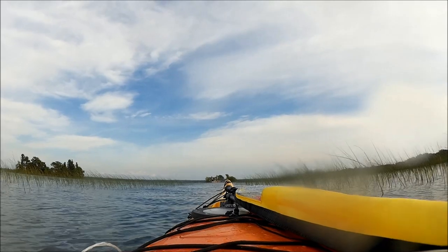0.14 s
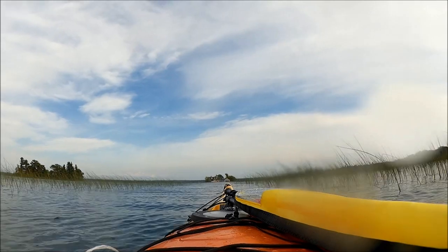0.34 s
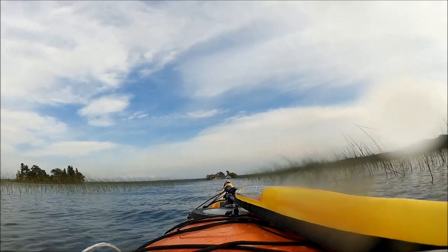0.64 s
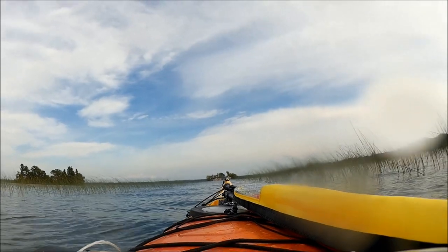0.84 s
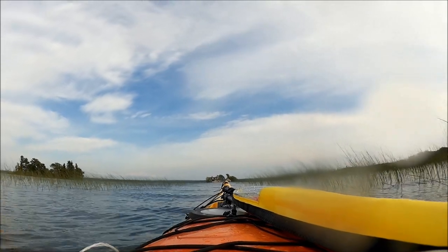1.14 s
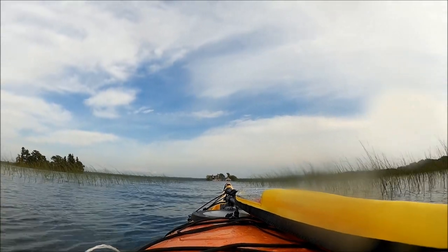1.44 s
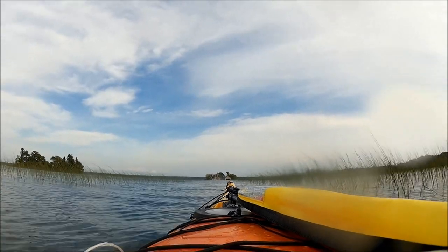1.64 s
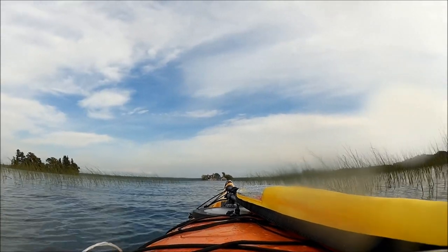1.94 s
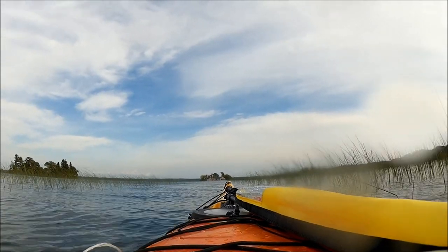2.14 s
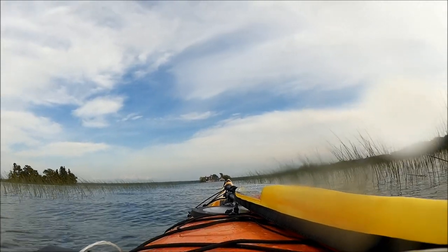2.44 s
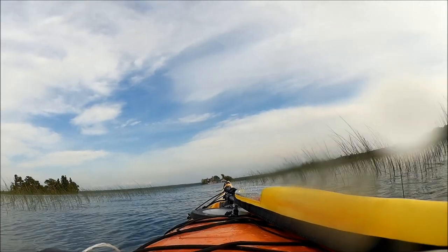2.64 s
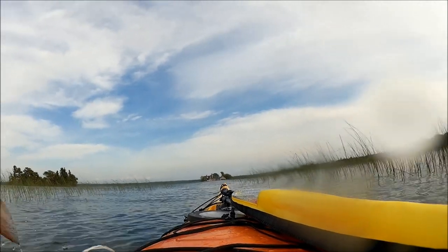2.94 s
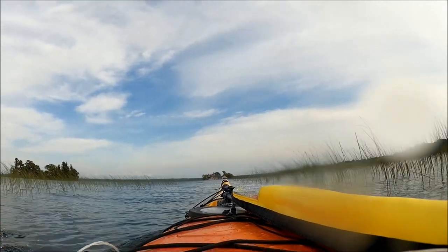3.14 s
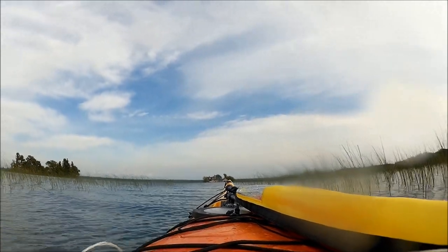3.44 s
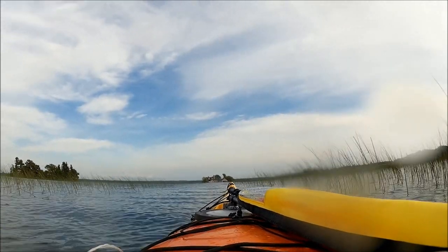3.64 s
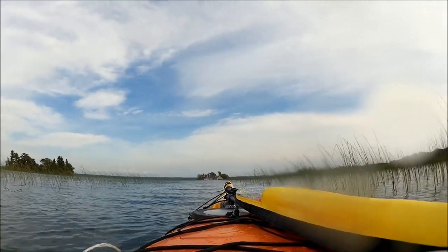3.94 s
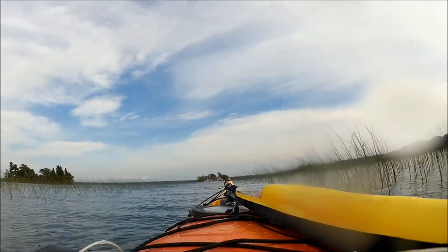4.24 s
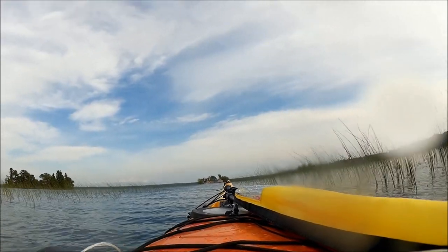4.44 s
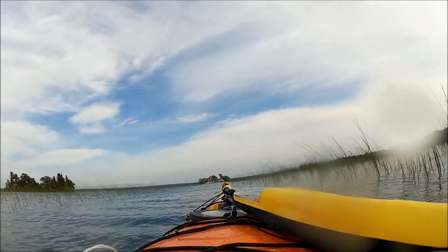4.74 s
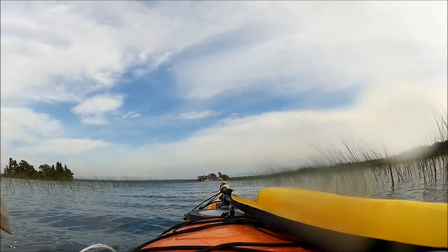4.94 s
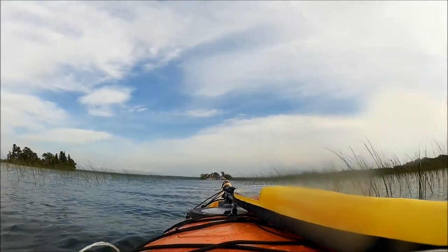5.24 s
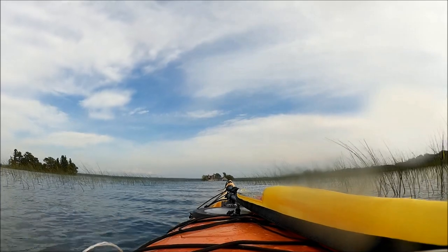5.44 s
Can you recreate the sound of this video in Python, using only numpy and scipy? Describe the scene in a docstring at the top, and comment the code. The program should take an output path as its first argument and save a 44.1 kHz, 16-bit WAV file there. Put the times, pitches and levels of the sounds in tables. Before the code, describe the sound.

Water slaps and splashes against a hollow kayak hull, with bubbly lapping, droplet ticks, small gulps and soft low wind gusts.

```python
"""Kayak hull under paddle strokes

Water splashes on a paddled hull: ringing bubbles make babble, short rings mark bubbles and slaps, gliding
tones make gulps and low thumps, noise bursts make slaps. Droplet clicks make spray, fizz and ticks; shaped
noise makes wind, hiss and a faint hull hum. Water reaches two ports with a lag, each through its cavity's
resonances. Levels precede pans, hull and ports."""
import sys
import numpy as np
from scipy import signal
from scipy.fft import rfft, irfft, next_fast_len
from scipy.io import wavfile
from scipy.ndimage import map_coordinates

SR = 44100
rng = np.random.default_rng(int(sys.argv[2]) if len(sys.argv) > 2 else 0)


def inscribe(sig):
    """Save sig as 16-bit PCM at rate SR to the path in sys.argv[1].

    A 1-D sig is mono; a 2-D sig holds one channel per row.
    Samples are clipped to [-1, 1] before scaling.
    """
    pcm = np.round(np.clip(np.atleast_2d(sig).T, -1, 1) * 32767)
    wavfile.write(sys.argv[1], SR, pcm.astype(np.int16))


N = 246519

# Splashes. Each row: start in seconds, babble level in dB, first bubble pitch in Hz,
# spray level in dB, decay in ms.
SPLASH_ROWS = [(0.02, -37, 730, -48, 57), (0.889, -35, 2200, -34, 24), (0.927, -38.5, 1480, -66, 140),
               (1.181, -46, 1400, -37, 71), (1.401, -28.5, 3000, -22, 26), (1.437, -28, 2240, -17, 38.4),
               (1.765, -31.5, 1160, -36, 33), (1.886, -31.5, 1150, -26, 57), (2.413, -33.5, 810, -28, 96),
               (2.783, -40.5, 1350, -41, 93), (3.314, -29.5, 5230, -22, 34), (3.349, -38.5, 5500, -16, 21),
               (3.403, -37, 3000, -54, 13), (3.735, -49, 1550, -64, 60), (3.757, -48, 3180, -25.5, 32),
               (3.801, -33, 1490, -65, 28), (3.867, -30, 1200, -22, 10), (3.908, -38, 1400, -37, 22),
               (5.319, -38, 2500, -18, 30), (5.374, -21.5, 1110, -58, 18), (5.473, -63, 900, -58, 29)]
# Side of the busiest water. Each row: time in seconds, lag of the right port in microseconds.
BEARING_CURVE = [(0.0, 117), (0.45, 68), (0.701, -100), (1.22, -55), (1.32, 112), (1.65, 135), (1.85, 69),
                 (2.2, 89), (2.31, -110), (3.0, -83), (3.2, 8), (3.32, 138), (3.7, 72), (4.1, 101),
                 (4.4, -100), (4.58, -76), (4.62, 135), (5.1, -21), (5.28, 140)]


def from_db(db):
    """Amplitude gain of a level in dB."""
    return 10 ** (np.asarray(db) / 20)


def rms_one(x):
    """Scales a signal to rms 1."""
    return x / np.sqrt(np.mean(x ** 2) + 1e-20)


def at_hz(points, hz):
    """Reads a (Hz, dB) curve on a log-frequency axis."""
    curve_hz, curve_db = np.transpose(points)
    return np.interp(np.log(hz), np.log(curve_hz), curve_db)


def drift(rate_hz):
    """Slow random curve of rms 1: noise through a two-pole low-pass, run at every 40th sample."""
    pole = np.exp(-80 * np.pi * rate_hz / SR)
    noise = rng.standard_normal(N // 40 + 2002)
    slow = signal.lfilter([1], [1, -2 * pole, pole * pole], noise)[2000:]
    return np.interp(np.arange(N) / 40, np.arange(len(slow)), rms_one(slow))


def coloured(x, spectrum):
    """Filters noise to a spectrum in dB per Hz; rms 1."""
    hz = np.maximum(np.fft.rfftfreq(N, 1 / SR), 1)
    return rms_one(irfft(rfft(x) * from_db(at_hz(spectrum, hz)), N))


def grains(per_s, spread_db):
    """Random clicks of uneven size and either sign."""
    sizes = from_db(spread_db * np.minimum(rng.exponential(1, N), 4))
    signs = rng.choice([-1, 1], N)
    return sizes * signs * (rng.random(N) < per_s / SR)


def add(out, start_s, sound):
    """Mixes a sound in at a time."""
    at = int(start_s * SR)
    out[at:at + len(sound)] += sound[:N - at]


def in_time(rows):
    """Interpolates the dB columns over time into gains at every sample."""
    times_s, *levels_db = np.transpose(rows)
    return from_db([np.interp(np.arange(N) / SR, times_s, column) for column in levels_db])


def bearing_lag_us():
    """Lag of the right port at every sample."""
    return np.interp(np.arange(N) / SR, *np.transpose(BEARING_CURVE))


def dying(decay_ms):
    """Splash envelope: sudden start, exponential tail."""
    rise_s = 0.0012
    t = np.arange(0, 6 * decay_ms / 1000, 1 / SR)
    return np.minimum(t / rise_s, 1) * np.exp(-1000 * t / decay_ms)


def water_gains():
    """Gains of lapping babble, spray and wind; splashes throw extra spray."""
    # Lapping that swells and sinks unevenly. Each row: time in seconds, babble level in dB, spray level in dB.
    lapping_rows = [(0.0, -37.5, -36.5), (0.4, -45, -37.5), (0.7, -44, -89), (0.96, -50, -38.5),
                    (1.28, -51.5, -48.5), (1.51, -39, -58), (1.87, -41, -55), (2.18, -43, -32.5),
                    (2.54, -45.5, -50.5), (2.82, -40, -51), (3.05, -44.5, -46.5), (3.27, -48, -36.5),
                    (3.43, -40.5, -49), (3.58, -47, -40), (3.8, -33, -55), (4.14, -43.5, -36.5),
                    (4.35, -46.5, -48.5), (4.92, -49, -47), (5.29, -45.5, -43), (5.39, -43.5, -77),
                    (5.59, -35.5, -41)]
    # Gusts on the ports. Each row: time in seconds, wind level in dB.
    gust_rows = [(0.0, -48), (0.23, -53), (0.43, -54.5), (0.7, -55.5), (1.28, -60), (1.5, -46.5),
                 (1.62, -59.5), (2.04, -45), (2.18, -57.5), (2.54, -41.5), (2.85, -49.5), (3.0, -52.5),
                 (3.27, -57), (3.43, -43), (3.56, -47), (3.74, -41), (4.3, -57.5), (4.66, -50.5),
                 (5.35, -45.5), (5.5, -39), (5.59, -43.5)]
    babble_gain, spray_gain = in_time(lapping_rows)
    wind_gain, = in_time(gust_rows)
    for start_s, _, _, spray_db, decay_ms in SPLASH_ROWS:
        add(spray_gain, start_s, from_db(spray_db) * dying(decay_ms))
    return babble_gain, spray_gain, wind_gain


def wind(alike):
    """Low noise, partly shared by the ports, gusting separately in each."""
    # Wind spectrum. Each row: frequency in Hz, level in dB per Hz.
    wind_spectrum = [(25, -18), (40, 3), (70, 3.5), (120, 9), (200, -1.5), (330, -7), (600, -25),
                     (1500, -99)]
    shared = rng.standard_normal(N)
    alike = np.clip(alike, 0, 1)
    ports = []
    for _ in range(2):
        noise = np.sqrt(alike) * shared + np.sqrt(1 - alike) * rng.standard_normal(N)
        ports.append(coloured(noise, wind_spectrum) * from_db(6.7 * drift(30)))
    return np.array(ports)


def hiss():
    """Separate steady noise in each port, its level flickering a little."""
    # Hiss spectrum. Each row: frequency in Hz, level in dB per Hz.
    hiss_spectrum = [(1500, -24), (4000, -11), (7500, -5.5), (10400, -10), (12500, -15.5), (14500, -30),
                     (15500, -56)]
    level_db, flicker_db = -72.5, 2.5
    ports = [coloured(rng.standard_normal(N), hiss_spectrum) * from_db(flicker_db * drift(17.0))
             for _ in range(2)]
    return from_db(level_db) * np.array(ports)


def hum():
    """The hull drones faintly as water slides by: noise in one low resonance."""
    hum_hz, q, level_db = 190, 2.7, -55
    peak = signal.iirpeak(hum_hz, q, fs=SR)
    return from_db(level_db) * rms_one(signal.lfilter(*peak, rng.standard_normal(N)))


def babble(lapping_gain, per_s, mean_cycles, climb, wash, froth):
    """Random bubbles on a smooth wash; each swells, rings a few cycles and climbs in pitch."""
    # Loudness by bubble size. Each row: bubble pitch in Hz, level in dB.
    size_levels = [(150, -3), (300, -7.5), (600, -2.5), (1000, -1), (1600, -3), (2300, -4.5), (3300, -2.5),
                   (4600, 1.5)]
    sink_octaves, sink_s = 0.59, 0.027   # small bubbles burst first, larger ones follow
    clicks = rms_one(grains(per_s * from_db(4.0 * drift(9)), spread_db=3.0))
    noise = rng.standard_normal((2, N))
    dealt = rng.integers(0, 20, N)   # bubble size of each click
    pitches_hz = np.geomspace(160, 4500, 20)
    jitter = rng.random(len(pitches_hz)) / len(pitches_hz)
    pitches_hz = pitches_hz * 2 ** (jitter * np.log2(pitches_hz[-1] / pitches_hz[0]))
    tails = [dying(row[-1]) for row in SPLASH_ROWS]
    sunk_octaves = sink_octaves * (1 - np.exp(-np.arange(2 * SR) / SR / sink_s))
    out = 0
    for k, (hz, keen, lasting) in enumerate(zip(pitches_hz, *rng.random((2, 20)))):
        # some sizes ring for more cycles; higher pitches ring for fewer
        cycles = mean_cycles * from_db(5.6 * (lasting - .5) - 1.0 * np.log2(hz / 1000))
        turn = np.arange(0, 6 * cycles / hz, 1 / SR) * hz   # time in cycles
        phase = turn + climb * keen * turn ** 2
        bubble = turn * np.exp(-turn / cycles) * np.sin(2 * np.pi * phase)
        births = rms_one(clicks * (dealt == k))
        # each size comes and goes
        lapping = lapping_gain * from_db(at_hz(size_levels, hz) + 2.85 * drift(10.0))
        splashing = np.zeros(N)
        for (start_s, level_db, first_hz, _, _), tail in zip(SPLASH_ROWS, tails):
            # a splash favours one bubble size, which sinks in pitch
            octaves_off = np.log2(hz / first_hz) + sunk_octaves[:len(tail)]
            add(splashing, start_s, from_db(level_db - 3.5 * octaves_off ** 2) * tail)
        # splashes froth: so many bubbles that they merge
        drive = lapping * rms_one(births + wash * noise[k % 2])
        drive = drive + splashing * rms_one(births + froth * noise[k % 2])
        out = out + signal.oaconvolve(drive, bubble / np.linalg.norm(bubble))[:N]
    return out / np.sqrt(len(pitches_hz) / 2)


def spray(per_s, mist):
    """Droplet ticks in bands by size, in shared and separate flurries, on a fine mist of noise."""
    # Loudness by droplet size. Each row: frequency in Hz, level in dB.
    droplet_levels = [(1800, -4), (2800, -5), (4000, 11), (6000, 1.5), (8500, 21), (12000, -31)]
    out, flurry = 0, drift(27)
    edges_hz = np.geomspace(1800, 14000, 8)
    for low, high in zip(edges_hz, edges_hz[1:]):
        drops = rms_one(grains(per_s * from_db(9.4 * flurry + 4.0 * drift(11)), spread_db=2.5))
        drops = drops + mist * rng.standard_normal(N)
        sos = signal.butter(1, [low, high], "band", fs=SR, output="sos")
        level_db = at_hz(droplet_levels, np.sqrt(low * high))
        out = out + from_db(level_db) * rms_one(signal.sosfilt(sos, drops))
    return rms_one(out)


def fizz(spray_gain):
    """Band-passed clicks in quick puffs: fine spray through the air, louder the further right it breaks."""
    band_hz, level_db, db_per_us = (4140, 7500), -38.5, -0.1114
    drops = rms_one(grains(4500.0, spread_db=3.5)) * from_db(5.2 * drift(40))
    sos = signal.butter(2, band_hz, "band", fs=SR, output="sos")
    gain = spray_gain * from_db(level_db + db_per_us * bearing_lag_us())
    return rms_one(signal.sosfilt(sos, drops)) * gain


def ticks():
    """Tiny drops close to the ports ring a few cycles; splashes throw further stray ones."""
    # Droplets ticking on the deck. Each row: start in seconds, peak level in dB, pitch in Hz.
    tick_rows = [(0.9042, -45, 6800), (1.2425, -50, 5550), (1.6983, -43, 3930), (1.9275, -40, 4580),
                 (2.2338, -44, 4110), (2.4064, -40, 5050), (2.4385, -37.5, 4430), (2.4792, -42, 6300),
                 (2.581, -47, 4800), (2.8902, -52, 4520), (3.1854, -44, 8250), (3.3173, -54, 4270),
                 (3.7601, -44, 3820), (3.8705, -38, 3600), (4.2593, -39, 4100), (4.8273, -48, 3600)]
    ring_cycles = 3.5   # to the peak of the swell, also its decay constant
    stray_count, low_hz, high_hz = 160, 3480, 9400
    stray_db, stray_spread_db, mean_fall_s = -61, 6.0, 0.19
    drops = list(tick_rows)
    for which, wait, size, pitch in rng.random((stray_count, 4)):
        splash_s = SPLASH_ROWS[int(which * len(SPLASH_ROWS))][0]
        start_s = splash_s - mean_fall_s * np.log(1 - wait)
        level_db = stray_db + stray_spread_db * (2 * size - 1)
        drops.append((start_s, level_db, low_hz * (high_hz / low_hz) ** pitch))
    out, t = np.zeros(N), np.arange(400) / SR
    for start_s, level_db, hz in drops:
        ring = hz * t / ring_cycles
        if start_s < N / SR:
            shape = ring * np.exp(1 - ring)
            add(out, start_s, from_db(level_db) * shape * np.sin(2 * np.pi * hz * t))
    return out


def short_ring(hz, fall_s, phase_turns):
    """One short ring swells, dies away and rises a little in pitch; returns its lead-in in seconds too."""
    rise_s = min(0.48 * fall_s, 0.0041)   # long rings still start suddenly
    climb = 0.017
    t = np.arange(-3 * rise_s, 6 * fall_s, 1 / SR)
    shape = np.where(t < 0, np.exp(-.7 * (t / rise_s) ** 2), 1 / np.cosh(1.67 * t / fall_s))
    turns = hz * (t + climb * t ** 2 / (rise_s + fall_s)) + phase_turns
    return 3 * rise_s, shape * np.sin(2 * np.pi * turns)


def short_rings():
    """Short rings: bubbles, and the ringing of slaps, each blurred by a brood of neighbours of random pitch."""
    # Short rings. Each row: time of the peak in seconds, peak level in dB, pitch in Hz, fall in ms.
    ring_rows = [(0.035, -29, 710, 4.4), (0.0755, -33, 2480, 3.5), (0.302, -33.5, 2180, 1.9),
                 (0.454, -23, 163, 0.88), (0.612, -38.5, 1150, 10), (0.668, -34.5, 540, 5.6),
                 (0.78, -31.5, 814, 7.9), (0.891, -24, 2260, 0.92), (0.901, -25, 1360, 0.85),
                 (0.909, -22, 2060, 1.4), (0.917, -28, 1180, 1), (0.929, -47, 1740, 2.5),
                 (0.9538, -31.5, 756, 6.6), (0.988, -29.5, 680, 3.1), (1.012, -33, 597, 4.7),
                 (1.079, -29.5, 1030, 2.5), (1.183, -36, 714, 5.7), (1.192, -34, 2080, 1.7),
                 (1.284, -30, 2620, 1.9), (1.408, -20, 3200, 1.4), (1.412, -19, 2020, 3.8),
                 (1.4475, -46, 1750, 3.3), (1.522, -35, 2220, 1.7), (1.562, -40, 710, 4.7),
                 (1.717, -32.5, 1350, 3.5), (1.786, -30.5, 700, 5.7), (1.438, 6.5, 3170, 0.43),
                 (1.639, -29.5, 845, 7.4), (1.702, -18, 2480, 2.1), (1.7919, -26.5, 1910, 1.1),
                 (1.8267, -25, 2860, 0.91), (1.8682, -21, 590, 2.9), (1.886, -31.5, 2290, 3),
                 (1.9003, -23, 316, 3.3), (1.9043, -10.5, 874, 0.25), (1.9076, -20.5, 153, 4.7),
                 (1.928, -28.5, 3040, 2.1), (2.015, -34, 1860, 3.4), (2.108, -31, 846, 3.4),
                 (2.236, -33.5, 2350, 2.8), (2.379, -35, 2300, 3.3), (2.423, -31, 1550, 2.9),
                 (2.3143, -30, 1410, 3.6), (2.419, -18, 504, 3.6), (2.4228, -20, 277, 3.3),
                 (2.4409, -21.5, 453, 3.5), (2.4524, -23, 173, 16), (2.4637, -31, 476, 4.4),
                 (2.4778, -27, 2000, 1.3), (2.4903, -20, 700, 1), (2.4972, -27, 1076, 6),
                 (2.626, -34.5, 1390, 4.5), (2.699, -36.5, 1480, 4), (2.728, -34.5, 856, 9.1),
                 (2.726, -34.5, 2140, 2.2), (2.737, -34, 2030, 4.3), (2.988, -37.5, 2140, 3.2),
                 (3.179, -30, 1158, 8.6), (3.328, -19, 3180, 0.55),
                 (3.3486, -5, 2150, 0.8) , (3.352, -16, 3360, 1.1), (3.3565, -24.5, 740, 3.4),
                 (3.4075, -23, 2760, 0.32), (3.4102, -29, 520, 3.5), (3.448, -34.5, 2150, 3),
                 (3.661, -29.5, 2410, 2), (3.774, -29, 2820, 1.5), (3.5284, -31, 1330, 6.1),
                 (3.583, -29.5, 1242, 9.5), (3.7925, -24, 3000, 1.3), (3.8184, -12.5, 3160, 0.6),
                 (3.8189, -21, 645, 2.8), (3.8515, -20.5, 920, 2.8), (3.851, -28.5, 248, 19),
                 (3.8745, -21, 1010, 1.1), (3.881, -35, 1710, 2.8), (3.92, -35, 1690, 3.6),
                 (3.9304, -16, 667, 1.64), (4.2618, -32.5, 2120, 3.4), (4.263, -31.5, 327, 4.7),
                 (4.311, -35, 2270, 2.2), (4.629, -29.5, 2005, 3.9), (4.634, -23.5, 1160, 2.7),
                 (4.6349, -24.5, 560, 1.2), (5.279, -31.5, 1910, 2.2), (5.3087, -11.5, 2006, 2.6),
                 (5.3167, -9, 2370, 1.3), (5.3447, -32, 1160, 7.5), (5.376, -15.5, 950, 1.8),
                 (5.3793, -21, 3480, 1.2), (5.395, -19.5, 1870, 1.9), (5.4022, -25.5, 590, 6.6),
                 (5.491, -26, 198, 3.4), (5.401, -24, 967, 5.2), (5.432, -36, 1850, 2.5),
                 (5.418, -33, 630, 4.6), (5.4381, -30.5, 526, 7.8), (5.477, -31.5, 2310, 3.2),
                 (5.4776, -29.5, 780, 6.5), (5.4784, -26.5, 437, 9.8), (5.515, -31.5, 495, 8),
                 (5.542, -31, 826, 4), (5.55, -37, 1420, 2.3)]
    brood, brood_db, brood_top_db = 3, -11.5, -30.5   # count, level relative to the ring, highest level
    brood_octaves, brood_wait_s, brood_fall_s = 0.47, 0.009, 0.0026   # pitch spread either way, mean wait
    out = np.zeros(N)
    chances = rng.random((len(ring_rows), brood + 1, 3))
    for (peak_s, level_db, hz, fall_ms), chance in zip(ring_rows, chances):
        lead_s, sound = short_ring(hz, max(fall_ms, .2) / 1000, chance[0, 0])
        add(out, peak_s - lead_s, from_db(level_db) * sound)
        for phase, wait, pitch in chance[1:]:
            neighbour_hz = hz * 2 ** (brood_octaves * (2 * pitch - 1))
            _, sound = short_ring(neighbour_hz, brood_fall_s, phase)
            neighbour_db = min(level_db + brood_db, brood_top_db)
            add(out, peak_s + 2 * brood_wait_s * wait, from_db(neighbour_db) * sound)
    return out


def gulps_and_thumps():
    """Gulps and low hull thumps: fading, wavering tones; pitch glides slowly at first, mostly upward."""
    # Gulps and low hull thumps. Each row: start in seconds, length in seconds, first pitch in Hz,
    # last pitch in Hz, rms level before fading in dB, fading in dB per second.
    tone_rows = [(0.057, 0.096, 333, 324, -28.5, 600), (1.32, 0.075, 700, 1350, -34, 104),
                 (1.448, 0.045, 111, 115, -36, 100), (1.819, 0.057, 329, 820, -37, 295),
                 (2.371, 0.02, 1100, 1620, -36, 30), (2.941, 0.042, 387, 464, -26.5, 1197),
                 (3.319, 0.032, 469, 800, -31, 144), (3.362, 0.092, 101.6, 107, -38, 63),
                 (4.37, 0.035, 470, 624, -47, 50), (4.408, 0.017, 1060, 1420, -40.5, 200),
                 (5.315, 0.09, 121, 166, -19.5, 92)]
    edge_s, glide_power, waver_db = 0.003, 2.37, -1
    out = np.zeros(N)
    for start_s, length_s, first_hz, last_hz, level_db, fading_db_per_s in tone_rows:
        t = np.arange(0, length_s, 1 / SR)
        ends = np.clip(np.minimum(t, length_s - t) / edge_s, 0, 1)
        hz = first_hz + (last_hz - first_hz) * (t / length_s) ** glide_power
        gain = np.sqrt(2) * from_db(level_db - fading_db_per_s * t)
        add(out, start_s, gain * ends * np.sin(2 * np.pi * np.cumsum(hz) / SR))
    return out * from_db(waver_db * drift(25))


def slaps():
    """A push and noise burst through a resonance; returns thuds and the treble edge of overloaded slaps."""
    # Slaps. Each row: start in seconds, peak level in dB, ring pitch in Hz, ring Q (raised to 0.3 if lower),
    # burst decay in ms, peak level of the overload edge in dB.
    slap_rows = [(1.4394, -1.5, 1490, 0.38, 1.4, -23), (1.4417, -8, 1700, 1.3, 3.3, -48),
                 (1.700, -6.5, 4120, 0.53, 3.4, -38), (1.9044, -7, 1500, 0.22, 0.92, -37),
                 (3.3479, 4.5, 1510, 0.5, 0.59, -43), (3.405, -10, 1480, 0.64, 1.7, -58),
                 (3.8152, -15, 2000, 0.7, 0.82, -51), (4.2601, -5, 4220, 0.2, 2.9, -29.5),
                 (4.633, -19, 2230, 1.5, 3.7, -56), (5.306, -3, 1500, 0.12, 9.1, -35),
                 (5.314, 7, 1230, 0.12, 2.5, -46)]
    push, bare_share, edge_band_hz = 4.15, 0.03, (6500, 9720)
    thuds, edges = np.zeros((2, N))
    t = np.arange(2000) / SR
    bright = signal.butter(3, edge_band_hz, "band", fs=SR, output="sos")
    noises = rng.standard_normal((len(slap_rows), 2000))
    for (start_s, level_db, hz, q, decay_ms, edge_db), noise in zip(slap_rows, noises):
        burst = .5 * noise * np.exp(-1000 * t / decay_ms)
        burst[0] += push
        ring = signal.lfilter(*signal.iirpeak(hz, max(q, .3), fs=SR), burst)
        edge = signal.sosfilt(bright, burst) + bare_share * np.diff(burst, prepend=0)
        add(thuds, start_s, from_db(level_db) * ring / np.abs(ring).max())
        add(edges, start_s, from_db(edge_db) * edge / np.abs(edge).max())
    return thuds, edges


def hull(x):
    """The hollow hull repeats a sound in a rough, short tail of scattered echoes."""
    echoes_per_s, t60_s, tail_db = 900.0, 0.02, -10.5
    t = np.arange(SR // 10) / SR
    echoes = grains(echoes_per_s, spread_db=4.0)[:len(t)] * from_db(-60 * t / t60_s)
    return x + from_db(tail_db) * signal.oaconvolve(x, echoes / np.linalg.norm(echoes))[:N]


def late(x, extra_us):
    """Time-shifts a sound to the right port, early or late with the bearing."""
    lag_us = bearing_lag_us() + extra_us
    return map_coordinates(x, [np.arange(N) - lag_us * SR / 10 ** 6], order=3)


def port(x, cavity, gain_db):
    """Port cavity: second-order resonances divide the spectrum, anti-resonances multiply it."""
    size = next_fast_len(N + 4096)
    hz = np.fft.rfftfreq(size, 1 / SR)
    response = from_db(gain_db)
    for modes, power in zip(cavity, (-1, 1)):
        for mode_hz, q in modes:
            response = response * (1 - (hz / mode_hz) ** 2 + 1j * hz / mode_hz / q) ** power
    return irfft(rfft(x, size) * response, size)[:N]


def scene():
    """Water along the near side, ahead and across the hull reaches the ports with different lags."""
    # Port cavities: a list of resonances, then one of anti-resonances. Each row: frequency in Hz, Q.
    left_cavity = [(2200, 2.19), (2600, 1.16), (10000, 0.25)], [(6200, 0.45)]
    right_cavity = [(1500, 2.57), (4000, 1.07), (10000, 0.17)], [(2400, 1.62)]
    wind_pan_db, edge_right_db = -1.5, -54   # left over right; overload edge in the right port
    babble_gain, spray_gain, wind_gain = water_gains()
    thuds, overload_edges = slaps()
    near = hull(short_rings()) + gulps_and_thumps() + thuds + hum()
    left, right = near, late(near, extra_us=0) * from_db(-0.5)
    for extra_us, share_db, pan_db in ((42, -4.0, 1.0), (-61, -5.0, -3.8)):
        water = babble(babble_gain, per_s=1000.0, mean_cycles=2.75, climb=0.0097, wash=0.33, froth=0.82)
        water = from_db(share_db) * (water + spray_gain * spray(per_s=180.0, mist=0.32))
        left = left + from_db(pan_db / 2) * water
        right = right + from_db(-pan_db / 2) * late(water, extra_us)
    through_ports = np.array([port(left, left_cavity, 1.0), port(right, right_cavity, 0.24)])
    fine_drops = (ticks() + fizz(spray_gain)) * from_db([[-4.0], [2.5]])
    # the overload edge is added past the cavities
    past_ports = fine_drops + overload_edges * from_db([[0], [edge_right_db]])
    gusts = wind_gain * wind(alike=0.66) * from_db([[wind_pan_db / 2], [-wind_pan_db / 2]])
    return through_ports + past_ports + gusts + hiss()


def record(dry):
    """Rumble is rolled off, peaks beyond full scale clip, the top is cut."""
    rumble_cut = signal.butter(2, 45.0, "high", fs=SR, output="sos")
    top_cut = signal.cheby2(12, 70, 16400, fs=SR, output="sos")   # 70 dB down from 16400 Hz
    lean = signal.sosfilt(rumble_cut, dry)
    return signal.sosfilt(top_cut, np.clip(lean, -1, 1))


dry = scene()
out = record(dry)
inscribe(out)
```